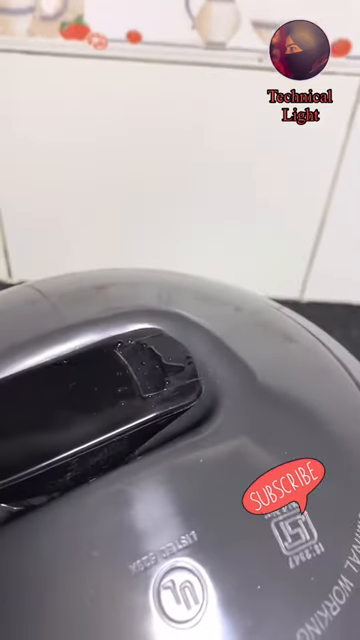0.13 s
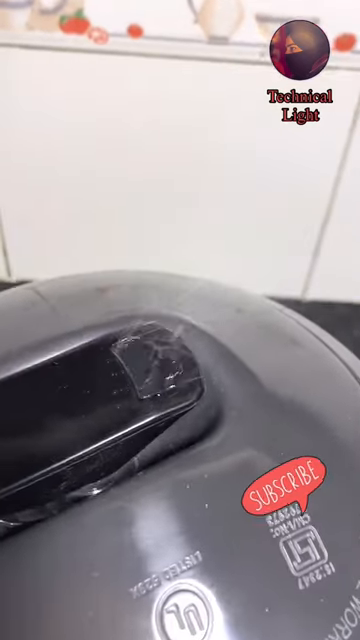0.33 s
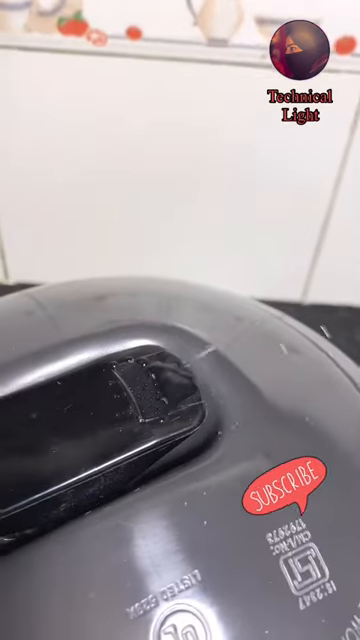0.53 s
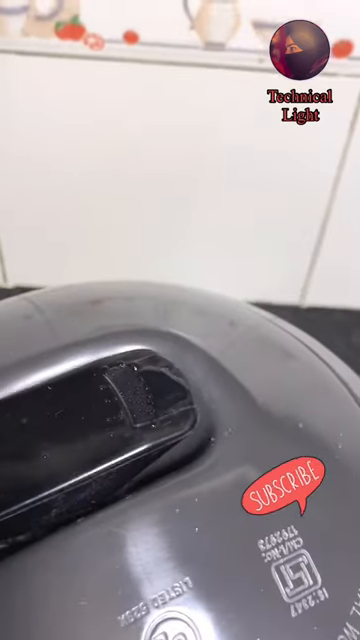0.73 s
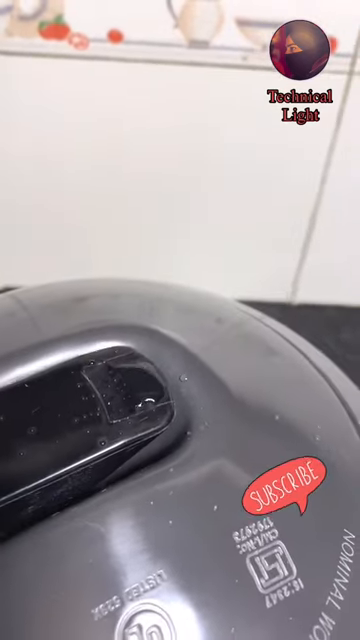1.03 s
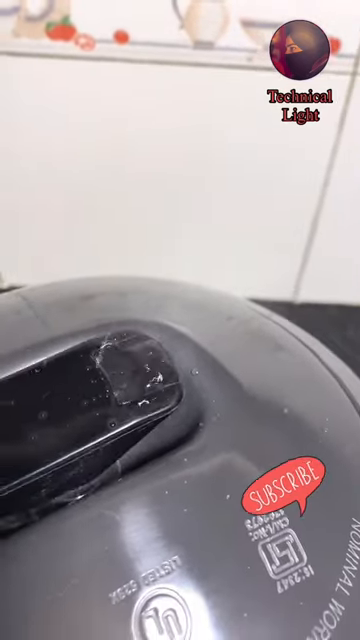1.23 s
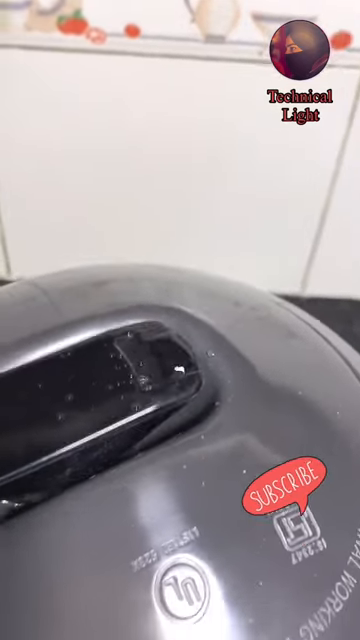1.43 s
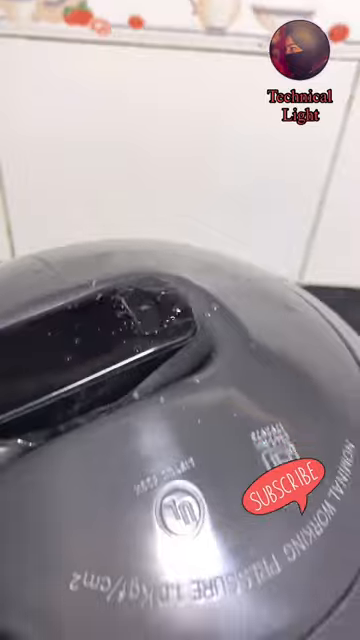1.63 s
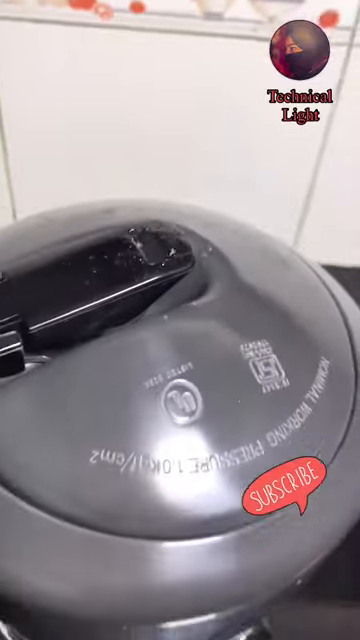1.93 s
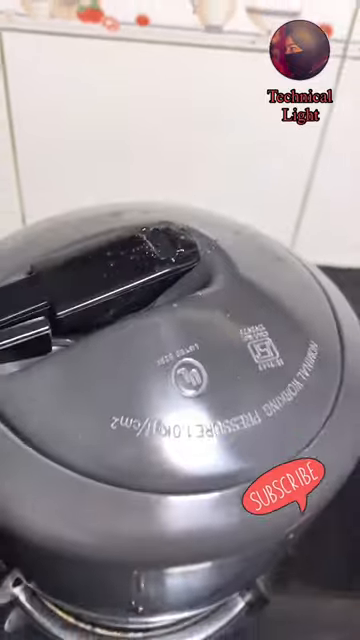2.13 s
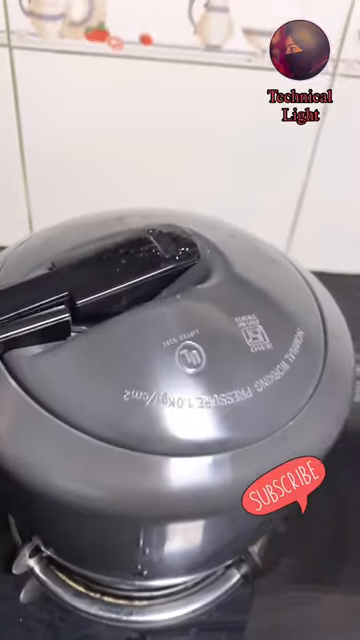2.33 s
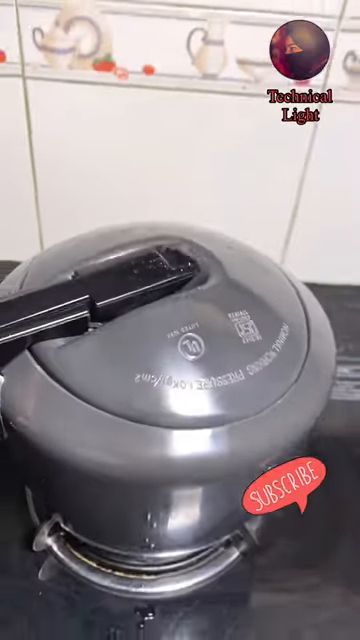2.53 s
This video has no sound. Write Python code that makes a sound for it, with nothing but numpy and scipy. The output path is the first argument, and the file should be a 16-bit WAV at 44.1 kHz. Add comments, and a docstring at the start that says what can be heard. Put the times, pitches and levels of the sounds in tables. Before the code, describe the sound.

A pressure cooker lets out three short, bright hisses of steam and then a longer one, each rasping with spits of water and ending in a small lever knock. Steam softly brushes the close microphone in a tiled kitchen.

```python
"""Four bright, wet hisses of steam burst from a pressure cooker in a tiled kitchen, the last one long. Pressing
the valve lever frees a turbulent jet; droplets rasp and slugs of water spit in the vent. After each burst the
lever slides back and shuts with a knock. Steam brushes the microphone, and a quiet simmer lies underneath. The
hiss sounds wide, its left and right sides drifting apart in phase as pitch rises."""
import sys
import numpy as np
from scipy import signal
from scipy.fft import rfft, irfft
from scipy.io import wavfile

SR = 44100
rng = np.random.default_rng(int(sys.argv[2]) if len(sys.argv) > 2 else 0)


def store_wav(level_fs):
    """Save 16-bit WAV to argv[1]."""
    pcm = np.round(np.clip(np.atleast_2d(level_fs), -1, 1) * 32767)
    wavfile.write(sys.argv[1], SR, pcm.T.astype(np.int16))


N = 119070


def from_db(db):
    """Decibels to gain."""
    return 10 ** (np.asarray(db) / 20)


def rms_one(x):
    """Scale to rms 1."""
    return x / np.sqrt(np.mean(x ** 2) + 1e-20)


def at_hz(points, hz):
    """Read a curve on a log pitch axis."""
    freqs, values = np.transpose(points)
    return np.interp(np.log(hz + 1), np.log(freqs + 1), values)


def colour(x, curve):
    """EQ by a curve in dB, then scale to rms 1."""
    return rms_one(irfft(rfft(x) * from_db(at_hz(curve, np.fft.rfftfreq(N, 1 / SR))), N))


def drift(rate_hz):
    """Smooth random wobble, rms 1."""
    pole = np.exp(-40 * np.pi * rate_hz / SR)
    slow = signal.lfilter([1], [1, -2 * pole, pole * pole], rng.standard_normal(N // 20 + 2002))[2000:]
    return np.interp(np.arange(N) / 20, np.arange(len(slow)), rms_one(slow))


def ring(drive, hz, t60):
    """One damped mode."""
    r, w = from_db(-60 / (t60 * SR)), 2 * np.pi * hz / SR
    return signal.lfilter([0, np.sin(w)], [1, -2 * r * np.cos(w), r * r], drive + 1e-18)


def swell(start, db, length):
    """Envelope: quick attack, hold until the length is up, exponential release."""
    age = np.arange(N) / SR - start
    attack = np.clip(age / (.3 * length), 0, 1)
    return from_db(db) * attack * np.exp(-np.clip(age - length, 0, 1) / (.7 * length))


def simmer():
    """Quiet simmer and room tone: coloured noise, slowly fading."""
    # spectrum of the bed (frequency [Hz], relative level [dB])
    bed_eq = [(50, 10), (150, 13.5), (600, -6), (1100, -6.5), (1550, 10.5), (2200, -3.5), (3500, -16),
              (5000, -21), (6700, 2.5), (8500, -6.5), (10000, -15), (11000, -3.5), (13000, -10),
              (15600, -7)]
    fade = from_db(-66 - 4.5 * np.arange(N) / SR)
    return fade * colour(rng.standard_normal(N), bed_eq)


def turbulence(curve, shared_db, own_db):
    """Rushing noise in third-octave bands that flutter together and on their own; rms 1."""
    hz = np.fft.rfftfreq(N, 1 / SR)
    spectrum = rfft(rng.standard_normal(N)) * from_db(at_hz(curve, hz))
    thirds = 3 * np.log2(hz + 1)
    flutter_db = shared_db * (drift(4.3) + 0.98 * drift(100))
    bands = (irfft(spectrum * np.clip(1 - abs(thirds - k), 0, 1), N) for k in range(14, 44))
    return rms_one(sum(from_db(flutter_db + own_db * drift(17)) * band for band in bands))


def droplets(curve, per_second=400):
    """Fine drops crackle in the vent: random clicks of uneven size."""
    hits = rng.random(N) < per_second / SR
    sizes = from_db(3.9 * np.minimum(rng.exponential(1, N), 4))
    return colour(hits * sizes * rng.choice([-1, 1], N), curve)


def steam():
    """A bright jet over a wet rasp; returns a mono hiss and a diffuse left-right pair."""
    # an envelope per burst, the last split into surge and hold (time [s], level [dB], rasp offset [dB])
    bursts = [
        [(0.165, -80, 5), (0.179, -44, -15), (0.195, -29.5, -14.5), (0.221, -13.5, -21), (0.245, -14, -11.5),
         (0.285, -20, -12), (0.312, -19, -19), (0.339, -23.5, -18.5), (0.385, -22.5, -18), (0.412, -19, -17.5),
         (0.43, -24.5, -20), (0.5, -29.5, -14), (0.512, -36, -16.5), (0.557, -37, -12), (0.585, -64, 10),
         (0.73, -70, 5.5)],
        [(0.74, -61, -2), (0.756, -36, -13), (0.774, -20, -11.5), (0.79, -11.5, -16.5), (0.81, -18, -12),
         (0.922, -24.5, -14.5), (0.95, -35.5, -14.5), (0.99, -73, -37)],
        [(1.11, -77.5, -32), (1.138, -31.5, -21), (1.176, -15, -7), (1.19, -19, -13), (1.314, -25, -14),
         (1.34, -32, -11), (1.375, -64, -11.5)],
        [(1.44, -69, -14), (1.46, -36, -20), (1.49, -20, -10.5), (1.56, -24.5, -14)],
        [(1.56, -22, -13.5), (1.692, -25, -14.5), (2.03, -26.5, -16.5), (2.28, -29, -15), (2.412, -31.5, -12.5),
         (2.448, -34, -5), (2.475, -50, 5)],
    ]
    # spectrum of the dry jet (frequency [Hz], relative level [dB])
    jet_eq = [(150, -40), (600, -44), (1500, -63), (3500, -15.5), (4150, -19), (4500, -14), (5100, -5.5),
              (6200, -6), (7900, 0.5), (9200, -2), (10600, -4.5), (12200, 1), (13300, -1.5), (14200, -5.5),
              (15600, -2)]
    # spectrum of the wet rasp, peaking near 2 kHz (frequency [Hz], relative level [dB])
    rasp_eq = [(60, -19), (130, -25.5), (250, -25.5), (600, -21), (1100, -13.5), (1300, -11), (1490, -8),
               (1700, -10), (2150, -1.5), (2450, -5), (2780, -9), (2940, -1), (3060, -14.5), (3400, -11),
               (3930, -4.5), (4200, -6.5), (5000, -13)]
    t, jet_env, rasp_env = np.arange(N) / SR, np.zeros(N), np.zeros(N)
    for times, db, rasp_db in map(np.transpose, bursts):
        gate = (t > times[0]) * (t <= times[-1])
        jet_env += gate * from_db(2.5 + np.interp(t, times, db))
        rasp_env += gate * from_db(np.interp(t, times, db + rasp_db))
    drops = from_db(-7) * droplets(rasp_eq)
    rasp = turbulence(rasp_eq, shared_db=-0.73, own_db=-4.5) + drops
    diffuse = [jet_env * colour(noise, jet_eq) + rasp_env * colour(noise[::-1], rasp_eq)
               for noise in rng.standard_normal((2, N))]
    jet = turbulence(jet_eq, shared_db=1.04, own_db=-1.5)
    return jet_env * jet + rasp_env * rasp, np.array(diffuse)


def lid_echoes(hiss, decay_s=0.018, level_db=-5.5):
    """Close reflections off lid and tiles put fine, steady peaks in the hiss."""
    cluster = rng.standard_normal(2000) * np.exp(-np.arange(2000) / (decay_s * SR))
    cluster = signal.lfilter(*signal.butter(2, 1200, "high", fs=SR), cluster)
    return hiss + from_db(level_db) * signal.fftconvolve(hiss, cluster / np.linalg.norm(cluster))[:N]


def water_slugs():
    """Each spit of water is a noise burst that rings the vent at its own pitch, over a broad spatter."""
    # spits (time [s], peak [dB], pitch [Hz], rise time [s], spatter offset [dB])
    spits = [(0.204, -28, 2160, 0.0017, -13), (0.2112, -23.5, 2300, 0.0021, -10),
             (0.221, -22, 2000, .001, -10), (0.23, -21.5, 2050, 0.0026, -9.5),
             (.2425, -20.5, 1690, 0.0051, -5), (0.247, -29, 2060, 0.0011, -14),
             (.2512, -8, 2037, 0.0009, -8), (0.2561, -21.5, 2010, 0.0025, -5),
             (.2665, -17, 1920, .002, -24), (.2715, -19, 2180, 0.0014, -7.5), (0.298, -29, 2230, .002, -9),
             (.306, -24, 1690, .001, -6), (0.31, -22.5, 2000, .004, -10), (0.4, -27, 2147, .005, -31),
             (0.413, -25.5, 2240, 0.0019, -30), (0.476, -30, 2450, .004, -20),
             (0.496, -31, 2440, 0.0039, -25), (0.797, -13.5, 1960, 0.00071, -6.5),
             (0.907, -28, 2120, 0.0034, -14.5), (1.173, -24.5, 2070, 0.0019, -4.5),
             (1.178, -41, 2530, 0.0024, -12), (1.204, -23.5, 2000, 0.0016, -21),
             (1.4915, -27, 2550, 0.00026, -14.5), (1.497, -29.5, 2120, 0.0046, -17),
             (1.5272, -20.5, 2400, 0.00045, -15), (1.757, -34, 2930, 0.0025, -26),
             (1.7857, -30, 2420, .001, -23), (1.788, -30, 2300, 0.00082, -26),
             (1.804, -24.5, 2820, .001, -27), (1.8184, -26.5, 2650, 0.00081, -24),
             (1.841, -31, 2570, 0.00086, -24.5), (1.867, -30, 2320, 0.00081, -20),
             (1.897, -41.5, 2260, 0.00091, -20), (1.9197, -27.5, 2850, 0.0013, -28),
             (1.982, -33.5, 2340, 0.0012, -25.5), (2.0471, -32, 2690, 0.0012, -23.5),
             (2.057, -29.5, 2480, 0.0011, -21.5), (2.075, -35, 2300, 0.0022, -27.5),
             (2.161, -25.5, 2440, 0.0016, -26), (2.193, -27.5, 2480, 0.0047, -28),
             (2.314, -31, 2900, 0.0014, -19.5), (2.331, -32, 2300, .002, -24.5),
             (2.426, -36, 2180, 0.0022, -15.5)]
    out, t = np.zeros(N + 2000), np.arange(2000) / SR
    for start, db, hz, rise, spatter_db in spits:
        rise = max(rise, .0003)
        half_width = 700 / (1 + rise / .0025)   # Hz; longer spits are more clearly pitched
        burst = rng.standard_normal(2000) * (t / rise) * np.exp(-t / rise)
        vent = signal.lfilter(*signal.butter(2, [hz - half_width, hz + half_width], "band", fs=SR), burst)
        spatter = signal.lfilter(*signal.butter(2, [500, 1500], "band", fs=SR), burst)
        splash = vent / abs(vent).max() + from_db(spatter_db) * spatter / abs(spatter).max()
        out[int(start * SR):][:2000] += from_db(db) * splash
    return out[:N]


def steam_puffs():
    """Steam brushes the microphone with soft, low lumps of air pressure."""
    # puffs (time [s], level [dB], length [s])
    puffs = [(.21, -62.5, 0.084), (.265, -50, 0.026), (.79, -65.5, 0.03), (1.175, -55, 0.026),
             (1.5, -60.5, 0.043), (.575, -60.5, 0.034), (.97, -58, 0.018), (1.352, -58, 0.026),
             (2.465, -65, 0.019)]
    rumble = signal.sosfilt(signal.butter(2, [45, 121], "band", fs=SR, output="sos"), rng.standard_normal(N))
    return sum(swell(*puff) for puff in puffs) * rms_one(rumble)


def lever(rub_t60=.016):
    """The lever slides with a dull rub and knocks shut, ringing the modes a little differently each time."""
    # slides open or back (time [s], level [dB], length [s], pitch [Hz])
    slides = [(0.54, -54.5, 0.038, 526), (0.758, -50, 0.018, 591), (.934, -46.5, 0.019, 615),
              (1.133, -56.5, 0.019, 625), (1.165, -44, 0.012, 755), (1.329, -43, 0.025, 548),
              (2.445, -46.5, 0.027, 495)]
    # closing knocks (time [s], level [dB], low-mode offset [dB], high-mode offset [dB])
    shuts = [(0.5667, -28, 3, 0), (0.9653, -32, 2.5, -4), (1.35, -24, -1.5, 0), (2.464, -29.5, -3, 5)]
    # modes of lever and lid (frequency [Hz], relative level [dB], t60 [s])
    modes = [(380, -26, .06), (520, -10, .055), (630, -10, .05), (820, -6, .045), (1050, -4, .014),
             (1300, -3, .012), (1650, -2, .012), (2100, -6, .012), (2680, -9, .012), (2900, -10, .035),
             (3200, -11, .01), (4500, -12, .01), (6000, -8, .012)]
    friction, out = rng.standard_normal(N), np.zeros(N)
    for start, db, length, hz in slides:
        rub = ring(ring(friction, hz, rub_t60), hz, rub_t60)
        out += rms_one(rub) * swell(start, db, length)
    times, knock_db, low_db, high_db = np.transpose(shuts)
    scatter_db = 3 * rng.uniform(-1, 1, (len(times), len(modes)))
    for k, (hz, mode_db, t60) in enumerate(modes):
        tone_db = (hz < 900) * low_db + (hz > 2400) * high_db + scatter_db[:, k]
        strikes = np.zeros(N)
        strikes[(times * SR).astype(int)] = (-1) ** k * from_db(knock_db + mode_db + tone_db)
        out += ring(strikes, hz, t60)
    return signal.sosfilt(signal.butter(2, 300, "high", fs=SR, output="sos"), out)


def kitchen(source):
    """Tiled-room reverb: three noise tails, each dying away octave by octave."""
    # reverb time (frequency [Hz], t60 [s])
    decay = [(100, 0.26), (600, 0.63), (2800, 0.47), (6000, 0.5), (15000, 0.29)]
    # reverb tone (frequency [Hz], relative level [dB])
    tail_eq = [(100, -4), (300, -2.5), (700, 3), (1500, 1), (2800, -2.5), (6000, -8), (15000, -7.5)]
    t, octaves = np.arange(SR) / SR, np.log2(np.fft.rfftfreq(SR, 1 / SR) + 1)
    white, tails = rfft(rng.standard_normal((3, SR))), np.zeros((3, SR))
    for k in range(5, 15):
        band = irfft(white * np.clip(1 - abs(octaves - k), 0, 1), SR)
        tails += band * from_db(at_hz(tail_eq, 2 ** k) - 60 * t / at_hz(decay, 2 ** k))
    onset = np.clip(t / 0.0026 - 1, 0, 1)   # short pre-delay, then fade in
    tails *= onset * from_db(-13) / np.sqrt(SR / 20)
    return signal.fftconvolve(source[None], tails, axes=1)[:, :N]


def stereo_colour(shared, diffuse):
    """Stereo colouring: left-right phase rises in steps with pitch, and a diffuse pair adds width."""
    # stepped left-right phase (frequency [Hz], phase [half turns])
    phase_steps = [(0, 0), (1900, 0), (2600, .45), (3800, .62), (4300, .95), (4700, 1), (6200, 1.55),
                   (6850, 2), (7550, 2), (8400, 2.5), (9300, 3), (10200, 3), (11100, 3.55), (11800, 4),
                   (13000, 4), (13700, 4.5), (14400, 5), (16000, 5)]
    # balance (frequency [Hz], left minus right [dB])
    balance = [(100, 0), (450, -2.5), (1300, 0), (2600, -4), (3500, -2), (6000, 0)]
    # EQ of the diffuse width (frequency [Hz], gain [dB])
    width_eq = [(60, -28), (150, -15.5), (600, -6.5), (1050, -19.5), (1400, -38), (1750, -29.5), (2600, -2),
                (6000, -5.5), (9000, -3.5), (16000, -0.5)]
    hz = np.fft.rfftfreq(N, 1 / SR)
    phase = np.pi * np.interp(hz, *np.transpose(phase_steps))
    left = from_db(at_hz(balance, hz) / 2) * np.exp(.5j * phase)
    # the diffuse width drops out in narrow treble bands
    width_dips = np.where(hz > 6200, abs(np.sin(phase)) + .01, 1)
    width = from_db(at_hz(width_eq, hz)) * width_dips
    return irfft(rfft(shared) * np.array([left, 1 / left]) + rfft(diffuse) * width, N)


def scene():
    """Mix cooker, puffs and ambience in stereo; of three rows, 0 feeds both sides, 1 and 2 one each."""
    hiss, hiss_diffuse = steam()
    puffs = np.array([steam_puffs() for _ in range(3)])
    cooker = lid_echoes(hiss) + water_slugs() + lever()
    ambience = kitchen(cooker) + np.array([simmer() for _ in range(3)])
    shared = cooker + puffs[0] + ambience[0]
    diffuse = hiss_diffuse + puffs[1:] + from_db(9) * ambience[1:]
    return stereo_colour(shared, diffuse)


def record(dry):
    """The microphone drops the lowest bass; the top is cut steeply."""
    dry = signal.sosfilt(signal.butter(4, 48, "high", fs=SR, output="sos"), dry)
    return signal.sosfilt(signal.ellip(16, .5, 80, 15740, fs=SR, output="sos"), dry)


dry = scene()
out = record(dry)
store_wav(out)
```